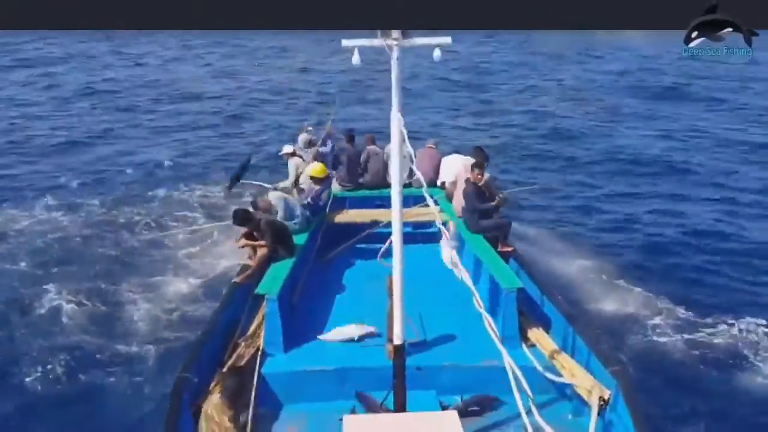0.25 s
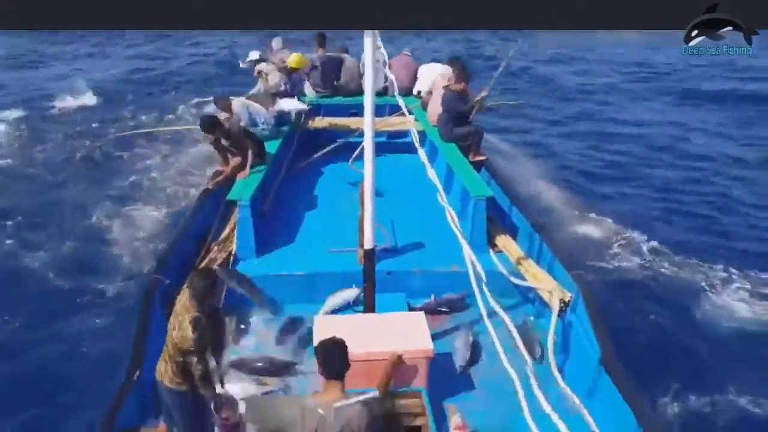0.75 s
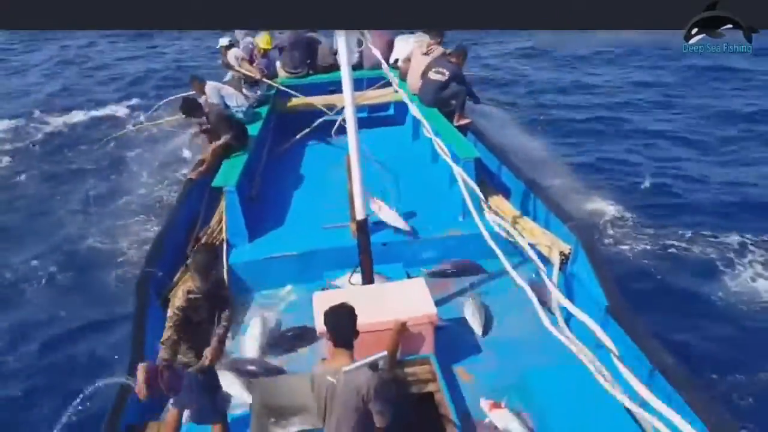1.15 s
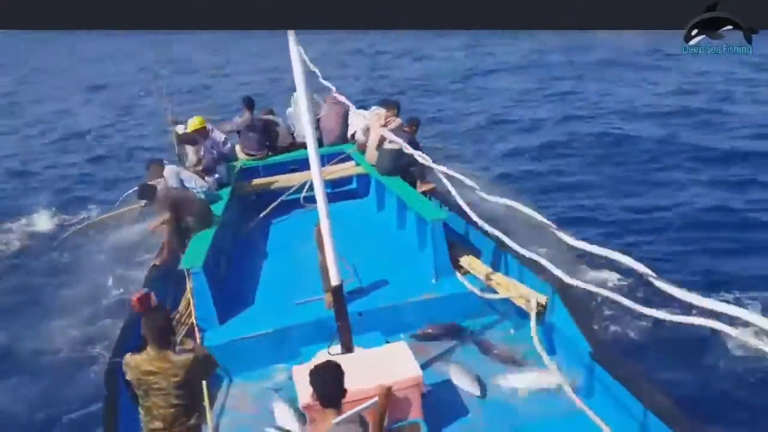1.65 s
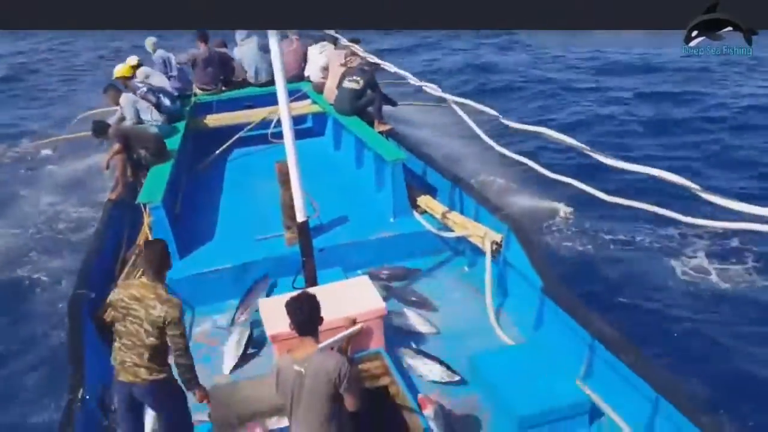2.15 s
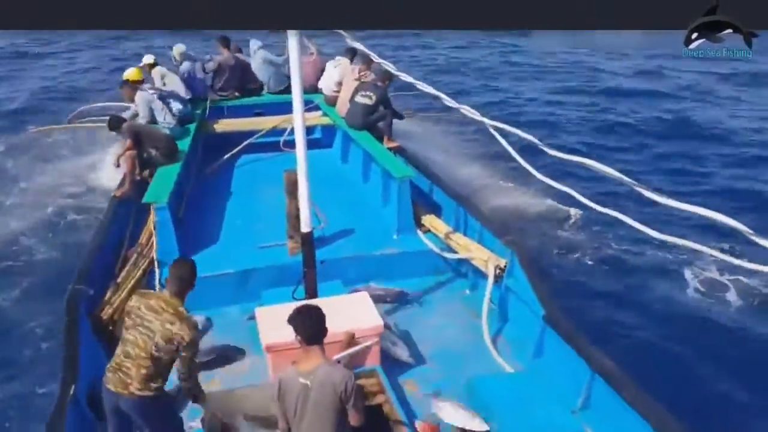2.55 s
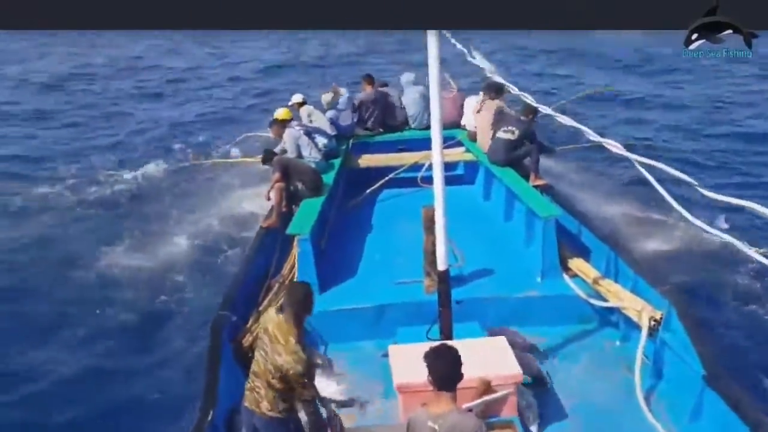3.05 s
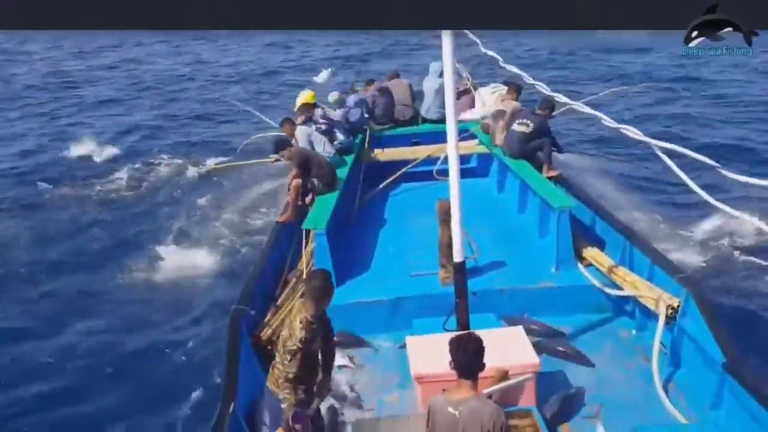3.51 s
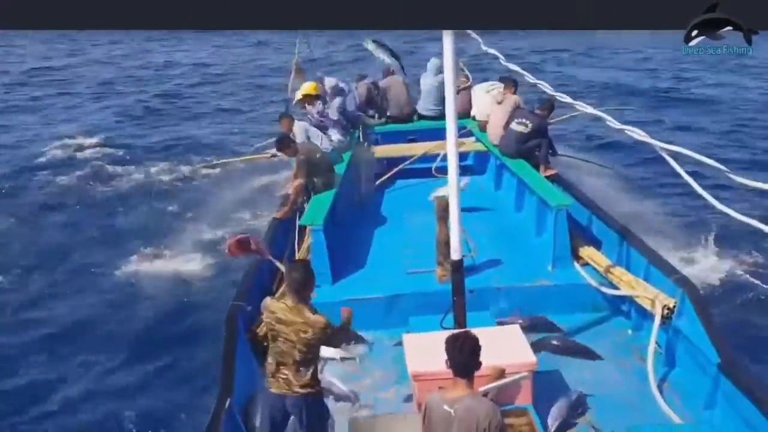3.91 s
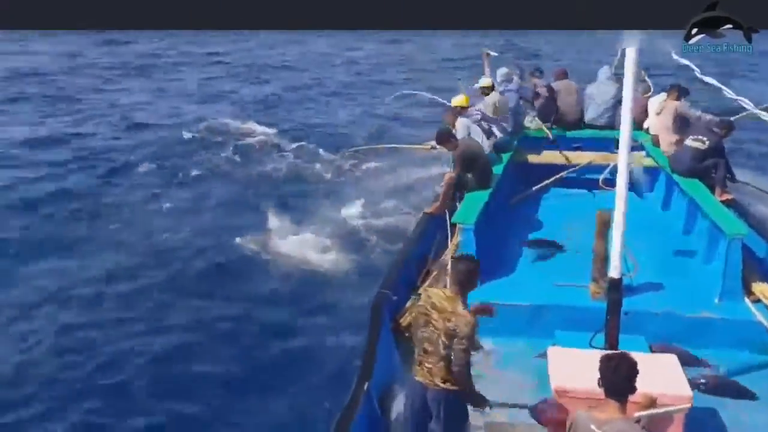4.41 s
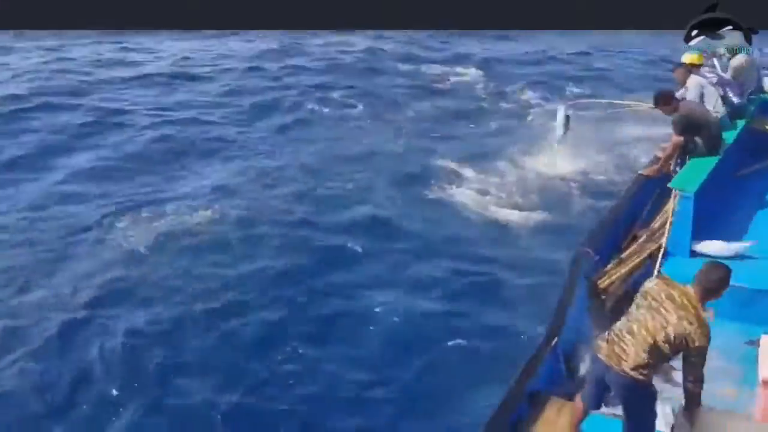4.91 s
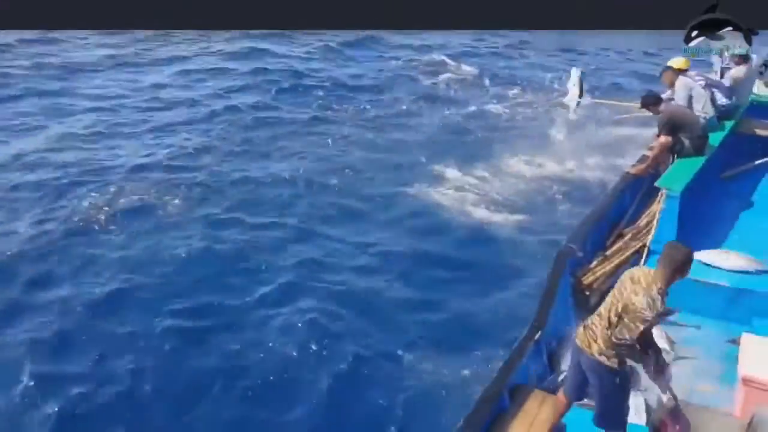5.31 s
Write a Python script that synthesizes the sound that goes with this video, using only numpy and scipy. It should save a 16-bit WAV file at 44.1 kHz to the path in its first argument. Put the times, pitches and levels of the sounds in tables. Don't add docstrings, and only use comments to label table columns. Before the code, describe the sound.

Water jets hiss steadily beside a fishing boat while landed fish slap wetly and rapidly on a hollow deck, over faint hull wash.

```python
import sys
import numpy as np
from scipy import signal
from scipy.fft import rfft, irfft, next_fast_len
from scipy.io import wavfile
from scipy.ndimage import uniform_filter1d

SR = 44100
rng = np.random.default_rng(int(sys.argv[2]) if len(sys.argv) > 2 else 0)


def elevation(decibels):
    levels = np.asarray(decibels, float)
    return 10 ** (levels / 20)


def waveform_to_disk(signal):
    frames = np.transpose(np.atleast_2d(signal))
    scaled = np.clip(frames, -1, 1) * 32767
    samples = np.round(scaled).astype(np.int16)
    wavfile.write(sys.argv[1], SR, samples)


N = 245637
TIME = np.arange(N) / SR


def unit(x):
    return x / np.sqrt(np.mean(x ** 2))


def shape(table, hz):
    f, db = np.transpose(table)
    return elevation(np.interp(np.log(hz + 1), np.log(f), db, left=-90, right=-90))


def colour(x, table):
    cepstrum = irfft(np.log(shape(table, np.linspace(0, SR / 2, 2049))))
    cepstrum[1:2048] *= 2
    cepstrum[2049:] = 0
    response = irfft(np.exp(rfft(cepstrum)))
    return unit(signal.fftconvolve(x, response)[:N])


def drops(abundance, spread_db, tail_s):
    chance, size = rng.random((2, N))
    hits = (chance < abundance / SR) * elevation(-spread_db * np.log(size + 0.05))
    return unit(signal.lfilter([1], [1, -np.exp(-1 / (tail_s * SR))], hits))


def patchy(x, step, flicker_db, rate):
    fft_size = next_fast_len(N, real=True)
    spectrum = rfft(x, fft_size)
    position = np.log2(np.linspace(1, SR / 2, fft_size // 2 + 1)) / step
    out = np.zeros(N)
    for k in np.arange(np.ceil(4 / step), 15 / step):
        part = spectrum * np.clip(1 - np.abs(position - k), 0, 1)
        if np.max(np.abs(part)) < 1e-3 * np.max(np.abs(spectrum)):
            continue
        band = irfft(part, fft_size)[:N]
        level = np.interp(TIME * rate, np.arange(400), rng.standard_normal(400))
        out += band * elevation(flicker_db * level)
    return unit(out)


def bursts(times, db, t60, rise_s):
    power = np.zeros(N)
    for t, level_db in zip(times, db):
        span = slice(int(t * SR), int((t + 0.2) * SR))
        age = np.clip(TIME[span] - t, 0, None)
        smeared_rise_s = rise_s * elevation(0.78 * (np.max(db) - level_db))
        rise = 1 - np.exp(-age / smeared_rise_s)
        power[span] += (elevation(level_db) * rise * 1000 ** (-age / t60)) ** 2
    return np.sqrt(power)


# (frequency [Hz], density [dB per Hz])
SPRAY_SPECTRUM = [(450, -24), (700, -13.5), (1500, -9.5), (2700, -11.5), (4200, -7.5), (5100, -4),
                  (5900, 1), (7000, -4.5), (8700, -13), (11000, -19.5), (15000, -27), (16000, -34)]


def bubbles(abundance, cycles, spread_db):
    out = np.zeros(N)
    for hz in np.geomspace(800, 14000, 40):
        count = int(abundance * hz / 1000)
        when, size = rng.random((2000, 2)).T[:, :count]
        births = np.zeros(N)
        births[(when * N).astype(int)] = elevation(-spread_db * np.log(size + 0.05))
        fade = np.exp(-hz / cycles / SR)
        turn = 2 * np.pi * hz / SR
        ring = signal.lfilter([1, 0, -1], [1, -2 * fade * np.cos(turn), fade ** 2], births)
        out += shape(SPRAY_SPECTRUM, hz) * np.sqrt(hz) * ring
    return unit(out)


def spray(db):
    close_drops = uniform_filter1d(drops(abundance=350, spread_db=5.0, tail_s=0.00033), size=12)
    curtain = (2 + 0.41 * close_drops) * rng.standard_normal(N)
    hiss = patchy(colour(curtain, SPRAY_SPECTRUM), step=0.5, flicker_db=2.5, rate=25)
    foam = bubbles(abundance=40, cycles=11.0, spread_db=5.5)
    return elevation(db - 0.7) * unit(hiss + 0.58 * foam)


# (time [s], crack level [dB], thump level [dB], plank pitch [Hz])
FLOPS = [(0.0, -9.5, -19, 430), (0.1664, -8.5, -25, 499), (0.343, -17, -24, 514), (0.415, -11, -23.5, 445),
         (0.4871, -12, -24.5, 506), (0.5679, -16, -22.5, 510), (0.6567, -15, -21, 552),
         (0.8734, -9.5, -17, 382), (0.9983, -14, -21.5, 613), (1.0179, -16, -22, 378),
         (1.125, -13.5, -27.5, 440), (1.3494, -13.5, -23, 297), (1.666, -12, -20, 556),
         (1.9776, -16, -29, 300), (2.044, -14.5, -23.5, 716), (2.8577, -16, -23.5, 835),
         (3.0698, -9.5, -12.5, 409), (3.6359, -12.5, -27, 276), (3.7537, -15.5, -23, 268),
         (3.8095, -15, -20, 750), (4.0151, -11.5, -26, 803), (4.156, -9, -26.5, 410),
         (4.3655, -16.5, -24.5, 560), (4.4047, -12.5, -20, 466), (4.918, -10.5, -22.5, 540),
         (4.928, -13.5, -21, 775), (5.2493, -13, -25.5, 329), (5.3147, -13.5, -26, 557),
         (5.367, -13, -22, 328), (5.5547, -14.5, -26, 296)]
# (time [s], crack level [dB])
FLICKS = [(0.0082, -10.5), (0.056, -4.5), (0.204, -12.5), (0.232, -10.5), (0.2875, -12), (0.409, -13),
          (0.4232, -10), (0.6265, -11), (0.6903, -10), (0.927, -12.5), (0.9435, -11.5), (1.063, -12.5),
          (1.5357, -11), (1.742, -15), (1.818, -10), (2.0246, -11), (2.147, -12), (2.5016, -11.5),
          (2.7909, -8.5), (2.8852, -8.5), (3.2299, -11), (3.3025, -9.5), (3.444, -9.5), (3.5146, -8.5),
          (3.9083, -14), (4.3363, -7.5), (4.5733, -8.5), (4.726, -8), (5.2585, -9), (5.4987, -13.5)]
# (time [s], crack level [dB])
SPLATS = [(0.085, -16.5), (0.118, -15), (0.3043, -16), (0.4542, -14), (0.726, -17), (0.8243, -14.5),
          (1.2174, -18), (1.416, -18), (1.517, -12), (1.546, -14), (1.6085, -16.5), (1.847, -13.5),
          (2.1144, -14), (2.2593, -12), (2.292, -15), (2.3509, -13), (2.5215, -13), (2.5344, -12),
          (2.6126, -15), (2.738, -14), (2.9313, -13.5), (3.2748, -15), (3.3486, -12.5), (3.6798, -16.5),
          (3.951, -15), (4.003, -12.5), (4.2954, -16), (4.5431, -12), (4.6975, -13), (4.764, -15)]
# (time [s], crack level [dB])
TAILS = [(0.8074, -7), (0.8852, -13), (1.0967, -16), (1.14, -14), (1.1655, -14), (1.1875, -13.5),
         (1.3, -11.5), (1.6847, -14.5), (1.7077, -13), (1.8804, -9.5), (1.9428, -11), (2.2172, -13.5),
         (2.4157, -12.5), (2.429, -14), (2.4588, -9.5), (2.7051, -13), (2.8168, -10.5), (2.8483, -8.5),
         (3.09, -19), (3.318, -9), (3.4593, -14), (3.605, -17.5), (3.8033, -9), (4.041, -14),
         (4.2216, -12.5), (4.443, -13), (4.8514, -10), (5.0931, -9), (5.2028, -10), (5.2358, -10.5)]
# (frequency [Hz], density [dB per Hz])
CRACK_SPECTRUM = [(1500, -41), (2500, -17.5), (3900, -10), (5000, -6), (5900, -0.5), (7000, -5.5),
                  (8700, -15.5), (11000, -21.5), (15000, -26), (16000, -40)]
# (frequency [Hz], density [dB per Hz])
BODY_SPECTRUM = [(400, -21), (750, -3), (1300, -1.5), (2200, -6), (3200, -13), (5000, -32.5)]


def slaps():
    kinds = [(FLOPS, -9), (TAILS, -15), (FLICKS, -23.5), (SPLATS, -21.5)]
    rows = [(t, db, body_db) for table, body_db in kinds for t, db, *_ in table]

    patter_db, patter_spread_db, patter_body_db = -20, 3, -19.5
    when = rng.random(90) * N / SR
    size = rng.standard_normal(90)
    rows += [(t, patter_db + patter_spread_db * z, patter_body_db) for t, z in zip(when, size)]
    t, db, body_db = np.transpose(rows)

    spatter = (0.5 + 0.29 * drops(abundance=440, spread_db=7.5, tail_s=0.0007)) * rng.standard_normal(N)
    crack = patchy(colour(spatter, CRACK_SPECTRUM), step=0.4, flicker_db=2.5, rate=55)
    body = patchy(colour(spatter, BODY_SPECTRUM), step=0.43, flicker_db=2.7, rate=22)
    tick_level = bursts(t, db + 0.97, t60=0.014, rise_s=0.00016)
    crack_level = bursts(t, db + 1.0, t60=0.077, rise_s=0.001)
    body_level = bursts(t, db + body_db + 3.0, t60=0.078, rise_s=0.00088)
    return crack * np.hypot(tick_level, crack_level) + body * body_level


# (time [s], level [dB], plank pitch [Hz])
KNOCKS = [(0.012, -20.5, 876), (0.217, -23.5, 380), (0.468, -23.5, 273), (0.552, -25.5, 864),
          (0.669, -23, 453), (0.817, -18.5, 362), (1.144, -18.5, 457), (1.36, -15, 285),
          (1.413, -22.5, 265), (1.607, -24, 359), (1.798, -22.5, 644), (1.825, -24.5, 269),
          (2.284, -24, 272), (2.317, -24.5, 334), (2.355, -26, 477), (3.082, -18, 853), (2.704, -26, 500),
          (2.897, -24, 274), (3.004, -23.5, 367), (3.157, -20.5, 272), (3.445, -20.5, 292),
          (3.844, -14, 305), (3.866, -22.5, 214), (3.932, -20, 303), (4.002, -20.5, 286),
          (4.046, -25.5, 224), (4.456, -20.5, 283), (4.471, -19, 251), (3.949, -24, 578), (5.044, -23, 258)]


def thumps():
    rows = list(KNOCKS) + [(t, db, pitch_hz) for t, _, db, pitch_hz in FLOPS]
    rattle_spectrum = [(100, -32), (200, -4.5), (450, -5.5), (800, -4.0), (1300, -21.5)]  # (Hz, dB)
    rattle = colour(rng.standard_normal(N), rattle_spectrum)
    out = np.zeros(N + SR)
    age = np.arange(SR // 3) / SR
    for t, db, pitch_hz in rows:
        upper, lower = rng.standard_normal(2)
        phase = 2 * np.pi * pitch_hz * age
        ring = np.sin(phase)
        ring += 0.32 * np.sin(phase * (1.1 + 0.161 * upper))
        ring += 0.21 * np.sin(phase * (0.69 + 0.045 * lower))
        t60 = 0.099 * (300 / pitch_hz) ** 0.3
        soft_rise = (1 - np.exp(-age / 0.0019)) ** 2
        start = int(t * SR)
        out[start:start + len(age)] += elevation(db + 5.0) * soft_rise * 1000 ** (-age / t60) * ring
    times, levels_db, _ = np.transpose(rows)
    return out[:N] + rattle * bursts(times, levels_db - 3, t60=0.066, rise_s=0.0014)


# (time [s], peak level [dB], half length [s])
WAVES = [(0.15, -44, .15), (0.45, -43.5, 0.11), (0.9, -45.5, 0.17), (1.37, -38, .04), (1.55, -44.5, 0.19),
         (1.968, -35, 0.026), (2.1, -43, 0.1), (3.2, -44, 0.088), (4.045, -37.5, .05), (4.46, -33, 0.07),
         (4.927, -43, .05), (5.385, -36, .04)]
# (frequency [Hz], density [dB per Hz])
WASH_SPECTRUM = [(110, -37), (170, -13.5), (220, -2.5), (290, 0.5), (380, 0), (650, -5), (900, -7.5),
                 (1200, -12.5), (1600, -33.5)]
# (frequency [Hz], density [dB per Hz])
RUMBLE_SPECTRUM = [(15, -62), (25, -22), (45, -16.5), (70, -12.5), (100, -4), (150, -0.5), (200, -8),
                   (260, -40)]


def sea(wash_db):
    gurgle = 0.5 + 0.28 * drops(abundance=180, spread_db=10.5, tail_s=0.0095)
    wash = colour(gurgle * rng.standard_normal(N), WASH_SPECTRUM)
    wash = patchy(wash, step=0.55, flicker_db=0.1, rate=18)
    rumble = colour(rng.standard_normal(N), RUMBLE_SPECTRUM)
    rumble = patchy(rumble, step=0.5, flicker_db=2.0, rate=8.3)

    swell_power = np.full(N, elevation(-49) ** 2)
    for t, db, half_s in WAVES:
        swell_power += elevation(db) ** 2 * np.exp(-((TIME - t) / half_s) ** 2)
    return elevation(wash_db + 0.38) * wash + elevation(0.6) * np.sqrt(swell_power) * rumble


# (time [s], spray level [dB], wash level [dB])
WATER = [(0.0, -21, -30.5), (0.3, -23, -30.5), (0.7, -19.5, -30), (1.13, -21.5, -29), (1.32, -20, -32),
         (1.45, -20.5, -31), (2.05, -21.5, -30.5), (2.45, -21.5, -30.5), (2.56, -20, -28),
         (2.93, -22.5, -30), (3.0, -19.5, -28.5), (3.4, -20, -31), (3.75, -20.5, -27.5), (4.0, -20.5, -31),
         (4.5, -19.5, -32.5), (4.92, -19, -30.5), (5.1, -20, -32), (5.57, -20.5, -31.5)]


def scene():
    t, *columns = np.transpose(WATER)
    spray_db, wash_db = (np.interp(TIME, t, column) for column in columns)
    mix = spray(spray_db) + slaps() + thumps() + sea(wash_db)
    return mix[None]


def thin_out(x, low_db, top_db, top_hz):
    frames = dict(fs=SR, window="cosine", nperseg=2048, noverlap=1024)
    hz, _, lines = signal.stft(x, **frames)
    nearby = np.sqrt(uniform_filter1d(np.abs(lines) ** 2, size=32, axis=-2))
    bar = elevation(low_db + (top_db - low_db) * (hz / top_hz) ** 3) * (hz > 700)
    kept = lines * (np.abs(lines) > bar[:, None] * nearby)
    return signal.istft(kept, **frames)[1][..., :N]


def band_limit(x):
    return signal.sosfilt(signal.butter(12, 15690, fs=SR, output="sos"), x)


def record(dry):
    ceiling, top_hz = 0.47, 14960
    no_bass = signal.sosfilt(signal.butter(2, 35, "high", fs=SR, output="sos"), dry)
    over = np.abs(no_bass) / ceiling
    limited = no_bass / (1 + over ** 8) ** (1 / 8)
    top_cut = signal.ellip(8, 0.3, 45, top_hz, fs=SR, output="sos")
    mix = thin_out(signal.sosfilt(top_cut, limited), low_db=-8.5, top_db=-1, top_hz=top_hz)
    return band_limit(mix)


dry = scene()
out = record(dry)
waveform_to_disk(out)
```